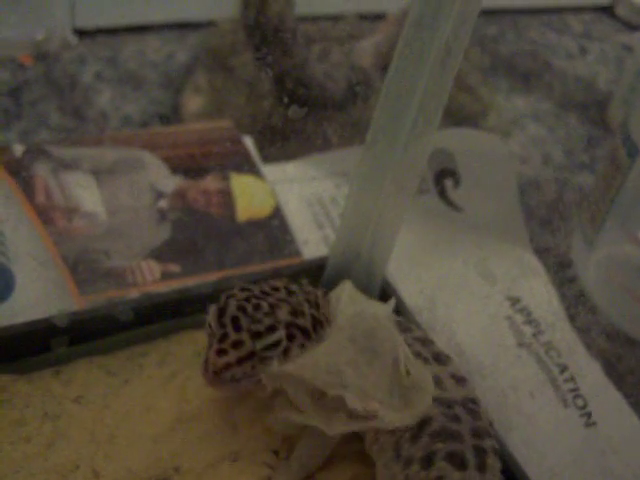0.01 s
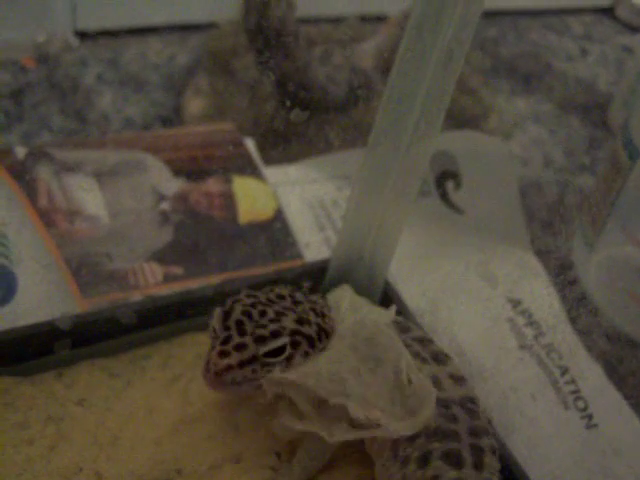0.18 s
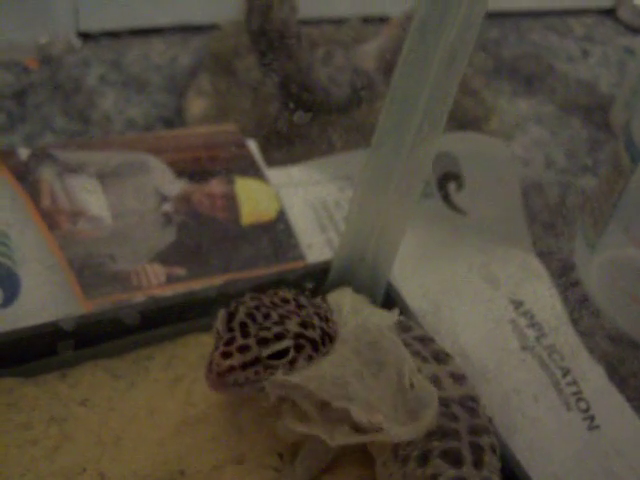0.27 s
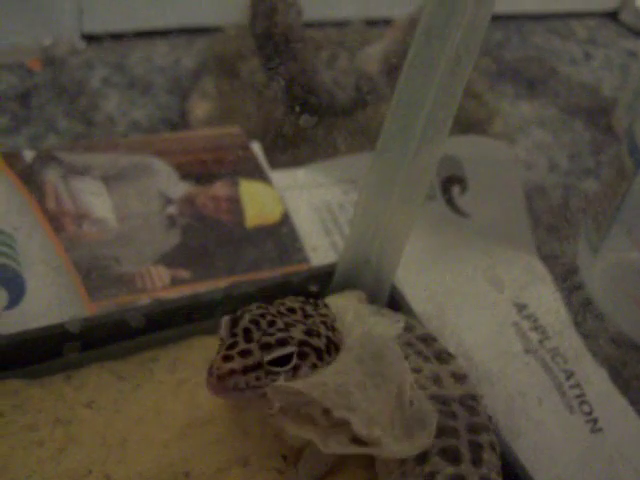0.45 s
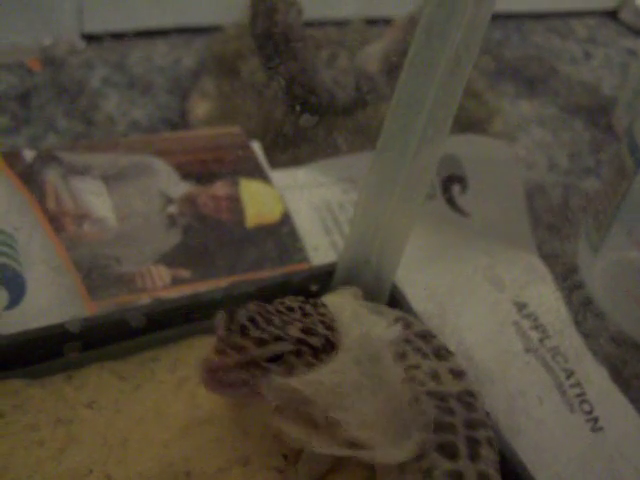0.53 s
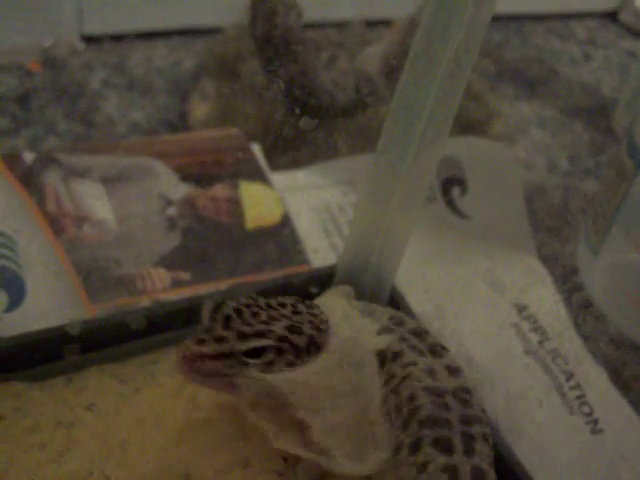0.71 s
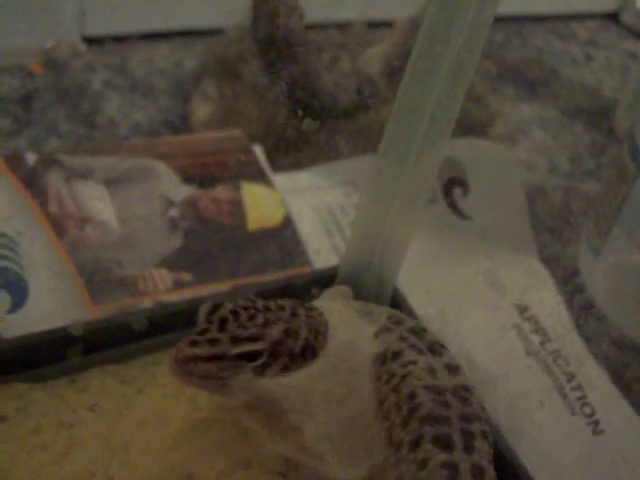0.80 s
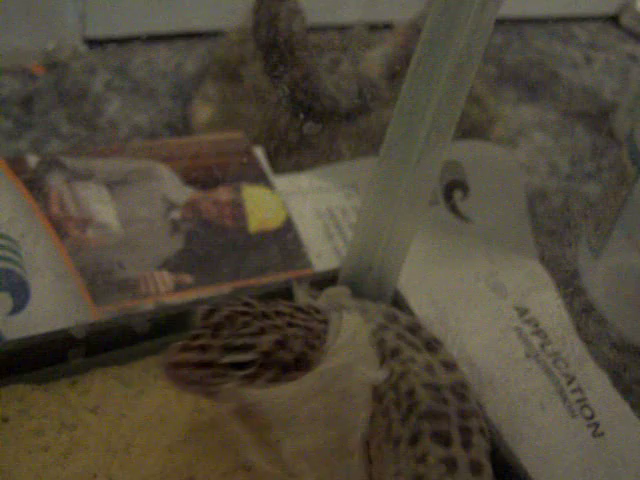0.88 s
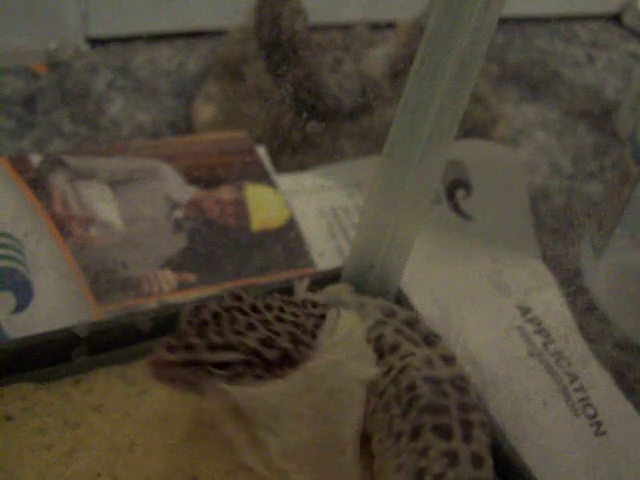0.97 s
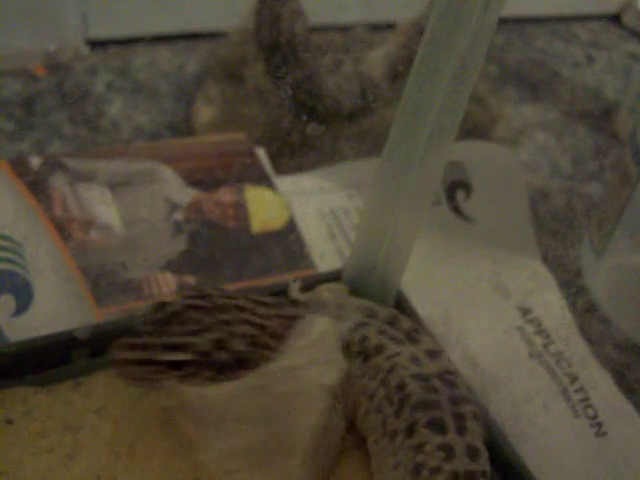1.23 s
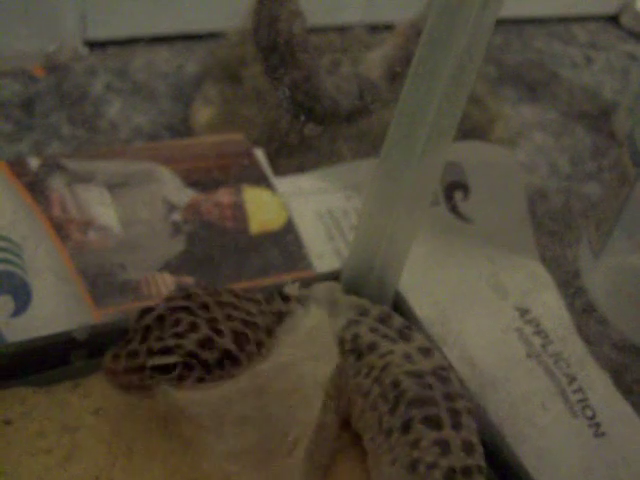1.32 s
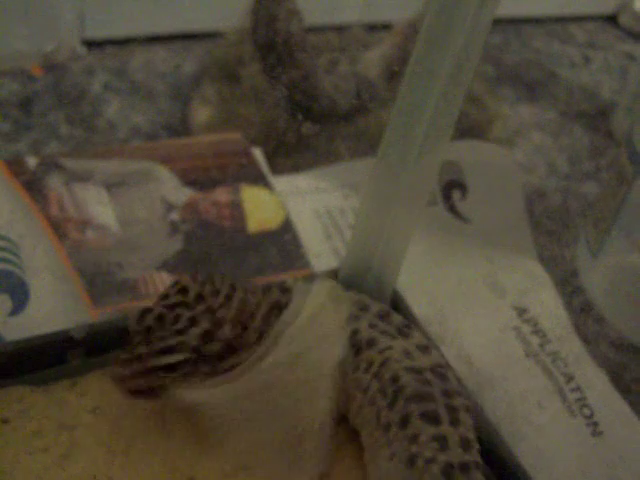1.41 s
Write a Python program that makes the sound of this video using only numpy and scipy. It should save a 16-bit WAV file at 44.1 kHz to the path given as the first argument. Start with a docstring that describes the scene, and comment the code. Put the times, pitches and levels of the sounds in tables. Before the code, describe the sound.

Soft, close crackling comes from a gecko shedding inside a small tank. Its dry skin snaps, rips in one harder tug, then the animal scuffs away, while the room hums and hisses faintly behind.

```python
"""Fine crinkling over a low room rumble, a hum and faint hiss: a gecko works out of its dry skin.
The skin gives way in sharp snaps, with one hard tug and a run of tears in the middle; each crease
or tear is a noise transient shaped by resonances. Then the animal steps away, its feet and sliding
body exciting the floor. The small tank around it rings briefly after each sound, through wall
reflections and lightly damped modes."""
import sys
import numpy as np
from scipy import signal
from scipy.fft import rfft, irfft
from scipy.io import wavfile

SR = 44100
rng = np.random.default_rng(int(sys.argv[2]) if len(sys.argv) > 2 else 0)


def to_wav(sig):
    """Store sig (one row per channel, or 1-D mono) as 16-bit WAV at the path in sys.argv[1].

    Samples outside -1..1 are clipped; the rate is SR.
    """
    pcm = np.clip(np.atleast_2d(sig), -1, 1) * 32767
    pcm = np.round(pcm).astype(np.int16)
    wavfile.write(sys.argv[1], SR, pcm.T)  # frames by channels


N = 63945

# Resonances that all the crackling passes through: f/Hz, bandwidth/Hz, gain/dB
CRACKLE_RESONANCES = [(1160, 200, -5.5), (1638, 82, -5), (1866, 200, -3.5), (2170, 460, 2.5), (2593, 71, 1),
                      (2890, 140, 1), (3912, 304, 3), (4146, 250, -5), (4700, 280, -7), (5290, 350, -4),
                      (6120, 740, -11.5), (7174, 370, -3.5)]
# Resonances of the floor: f/Hz, bandwidth/Hz, gain/dB
FLOOR_MODES = [(850, 380, -15), (1190, 230, -6), (2100, 660, -5.5), (3030, 400, 8), (3525, 200, 12),
               (3840, 250, 1.5), (4050, 200, 2.5), (5140, 270, -14.5), (6600, 370, -26.5)]


def from_db(db):
    """Amplitude ratio of a level: a factor of ten per 20 dB."""
    return 10 ** (np.asarray(db) / 20)


def rms_one(x):
    """Power normalisation to an rms of 1."""
    return x / np.sqrt(np.mean(x ** 2) + 1e-20)


def unit_energy(x):
    """Energy normalisation: the squares of each row sum to 1."""
    return x / np.sqrt(np.sum(x ** 2, axis=-1, keepdims=True) + 1e-20)


def envelope(points):
    """Amplitude envelope by linear interpolation of (t/s, level/dB) points."""
    return from_db(np.interp(np.arange(N) / SR, *np.transpose(points)))


def coloured(x, points):
    """Spectral shaping by (f/Hz, gain/dB) points on a logarithmic frequency axis; rms 1."""
    hz, db = np.transpose(points)
    bins = np.maximum(np.fft.rfftfreq(N, 1 / SR), 1)
    gain = from_db(np.interp(np.log(bins), np.log(hz), db))
    return rms_one(irfft(rfft(x) * gain, N))


def resonate(x, resonances):
    """Forced response of parallel damped resonators, plus a little direct sound, low-pass filtered."""
    out = from_db(-22) * x
    for hz, width, db in resonances:
        radius = np.exp(-np.pi * width / SR)
        feedforward = np.array([1, 0, -1]) * (1 - radius ** 2) / 2
        feedback = [1, -2 * radius * np.cos(2 * np.pi * hz / SR), radius ** 2]
        out = out + from_db(db) * signal.lfilter(feedforward, feedback, x)
    return signal.sosfilt(signal.butter(8, 7130, fs=SR, output="sos"), out)


def crinkle():
    """Shot noise: tiny creases of uneven size occur at random, and their decaying powers add."""
    # Crinkling as the animal moves: t/s, relative level/dB
    levels = [(0, -46), (.06, -47.5), (.1, -48.5), (.21, -44), (.29, -46), (.38, -51.5), (.44, -49),
              (.48, -48.5), (.54, -45.5), (.62, -43.5), (.66, -48.5), (.69, -40), (.73, -34.5), (.78, -37),
              (.83, -48), (.88, -42), (.95, -59.5), (.98, -44.5), (1.03, -45), (1.08, -57), (1.15, -52),
              (1.19, -53), (1.22, -56), (1.27, -46), (1.32, -57), (1.45, -47.5)]
    # Colour of the crinkling: f/Hz, gain/dB
    colour = [(500, 2), (1300, -2.5), (1800, -5), (3000, -0.5), (4000, 4), (5000, 2), (7300, 0.5),
              (8800, -1)]
    creases_per_s, spread_db, decay_s = 1100, 3.5, .001
    sizes = from_db(spread_db * np.minimum(rng.exponential(1, N), 4))
    creases = sizes * (rng.random(N) < creases_per_s / SR)
    power = signal.lfilter([1], [1, -np.exp(-2 / (decay_s * SR))], creases ** 2 + 1e-12)
    scratches = resonate(np.sqrt(power) * rng.standard_normal(N), CRACKLE_RESONANCES)
    return from_db(-2.5) * envelope(levels) * coloured(scratches, colour)


def rumble():
    """Amplitude-modulated noise: the room's low rumble slowly swells and sinks."""
    # Rumble spectrum: f/Hz, relative level/dB
    spectrum = [(25, -19), (45, -23.5), (62, -6), (85, -9.5), (140, 1.5), (175, -6.5), (240, -8.5),
                (335, -4), (410, -22), (600, -23.5), (1200, -63)]
    # Rumble envelope: t/s, level/dB
    levels = [(0, -44), (.07, -45), (.12, -50), (.19, -46.5), (.22, -47), (.33, -44), (.42, -48),
              (.75, -46.5), (.85, -49), (.96, -45), (1.2, -48), (1.33, -47.5), (1.45, -51)]
    return envelope(levels) * coloured(rng.standard_normal(N), spectrum)


def hiss():
    """Stationary broadband noise: the room's faint hiss."""
    # Hiss spectrum: f/Hz, relative level/dB
    spectrum = [(350, -3), (550, -6.5), (750, -3.5), (1400, -4.5), (2200, -2.5), (3300, -1), (3950, 0),
                (4800, -6), (6000, -15.5), (7400, -14.5), (8200, -19.5), (9000, -42.5)]
    return from_db(-52) * coloured(rng.standard_normal(N), spectrum)


def hum():
    """Random frequency and amplitude modulation make a low tone waver."""
    # Hum envelope: t/s, level/dB
    levels = [(0, -51), (.17, -64), (.23, -46.5), (.3, -48.5), (.4, -57), (.88, -60), (.95, -49),
              (.99, -44), (1.02, -50.5), (1.13, -50), (1.17, -36), (1.22, -63.5), (1.45, -57)]
    centre_hz, wander_hz, flutter_depth = 117.8, 3.5, 0.81
    t = np.arange(N) / SR
    wander, flutter = (np.interp(t, np.linspace(0, t[-1], n), rng.standard_normal(n)) for n in (24, 60))
    phase = 2 * np.pi * np.cumsum(centre_hz + wander_hz * wander) / SR
    return envelope(levels) * rms_one((1 + flutter_depth * flutter) * np.sin(phase))


def whine():
    """Superposition of faint steady sinusoids with random phases."""
    # Thin tones of the room: f/Hz, level/dB
    tones = [(339, -62), (554.5, -68), (592, -64.5)]
    t = np.arange(N) / SR
    return sum(from_db(db) * rms_one(np.sin(2 * np.pi * (hz * t + rng.random()))) for hz, db in tones)


def body_drag():
    """Sliding friction: the body drives the floor's resonances with faint continuous noise."""
    # Drag envelope: t/s, level/dB
    levels = [(0, -65), (.05, -48.5), (.12, -57), (1.15, -59.5), (1.19, -55), (1.27, -49.5), (1.32, -55.5),
              (1.45, -58.5)]
    return envelope(levels) * rms_one(resonate(rng.standard_normal(N), FLOOR_MODES))


def skin_snaps():
    """Sudden release of strain: each tear is a noise burst with its own balance of four bands."""
    # Tears: t/s, relative crack level/dB, then thud/dB, body/dB, edge/dB re the crack, rise time/s
    tears = [(0.124, -31.5, -23, -15, -5, 0.001), (0.2435, -28.5, -49, -1.6, -10.5, 0.00026),
             (0.287, -46, -30, -13, 5.5, 0.00054), (0.312, -42, -16, 4.5, 7, 0.00088),
             (0.3205, -28.5, -23, -13.5, -6, 0.00036), (0.328, -40.5, -19, -7, -16, 0.00097),
             (0.3405, -40.1, -21, -11, -7, 0.0008), (0.3478, -31, -26, -18.5, -5.5, 0.0012),
             (0.401, -31, -32, -5, -2.5, 0.0016), (0.4054, -43.5, -12.5, -4.5, 2.5, 0.0023),
             (0.4176, -30, -23, -12, -12.0, 0.00071), (0.4281, -20, -36, -8, -11.9, 0.00086),
             (0.4423, -47, -19.5, 0, 9, 0.00035), (0.4561, -31, -26, -7, -2, 0.00044),
             (0.503, -40, -28, -19, -6.5, 0.0008), (0.532, -49, -15.0, -7, 10.5, 0.002),
             (0.5522, -30, -19, -13, -13, 0.00027), (0.5541, -38, -11, -3.5, 5.5, 0.0022),
             (0.616, -46.5, -20, -10, 8.5, 0.0008), (0.623, -44.5, -20, -16, 3.5, 0.00074),
             (0.6985, -19, -9, -1.5, -7, 0.000067), (0.7007, -21, -25, -22, -5.5, 0.00035),
             (0.7032, -28, -15, -12, -10, 0.00052), (0.7079, -23.5, -28.5, -7, -20.5, 0.00096),
             (0.7113, -25, -26, -10, -8, 0.0008), (0.7222, -24, -13, -6.5, -9, 0.0014),
             (0.731, -24.5, -6.5, -0.9, -3.5, 0.00058), (0.7355, -29.5, -23, -1.5, -7.4, 0.0024),
             (0.7501, -24, -15, -5, -8, 0.00072), (0.7722, -32, -22, -4.5, -3, 0.00059),
             (0.7795, -32, -23, -11, -8, 0.00054), (0.793, -31, -23, -19, -13, 0.0008),
             (0.8003, -34.5, -13.5, -5, -0.5, 0.0032), (0.831, -41.5, -14.5, -6, -7, 0.0006),
             (0.892, -37.3, -21, -8.5, -10, 0.00073), (0.9121, -33, -18, -6, -13, 0.00038),
             (0.9212, -29.5, -26, -17, -7, 0.00083), (0.982, -35, -32.5, -12.5, -10.5, 0.002),
             (1.042, -36, -17, -20, -10, 0.0041), (1.1108, -43.5, -21, -5.5, -5.5, 0.001)]
    # Limits of the thud, body, crack and edge bands: f/Hz
    limits = [570, 1520, 3250, 4700, 9000]
    gain_db, release_s = 21.5, 0.0011
    t = np.arange(SR // 50) / SR
    onsets, crack_db, thud_db, body_db, edge_db, rise = np.transpose(tears)[:, :, None]
    shapes = np.minimum(t / (rise + 1e-9), 1) * np.exp(-np.maximum(t - rise, 0) / release_s)
    bursts = resonate(rng.standard_normal(shapes.shape) * shapes, CRACKLE_RESONANCES)
    snaps = 0
    for low, high, band_db in zip(limits, limits[1:], (thud_db, body_db, 0, edge_db)):
        band = signal.sosfilt(signal.butter(5, (low, high), "band", fs=SR, output="sos"), bursts)
        snaps = snaps + from_db(gain_db + crack_db + band_db) * unit_energy(band)
    out = np.zeros(N + SR)
    for start, snap in zip((onsets[:, 0] * SR).astype(int), snaps):
        out[start:start + len(t)] += snap
    return out[:N]


def footsteps():
    """Impact excitation: short scratchy contacts of the feet set the floor's resonances ringing."""
    # Taps and scuffs: t/s, relative level/dB, decay time/s
    contacts = [(1.1713, -28, 0.00036), (1.1756, -35.5, 0.0029), (1.1904, -43, 0.0011),
                (1.2238, -42.5, 0.00086), (1.2757, -35.5, 0.001), (1.2822, -38, 0.0017),
                (1.2893, -44.5, 0.00054)]
    gain_db = 21
    t = np.arange(SR // 50) / SR
    out = np.zeros(N + SR)
    for onset, db, decay in contacts:
        force = rng.standard_normal(len(t)) * np.exp(-t / decay)
        start = int(onset * SR)
        out[start:start + len(t)] += from_db(gain_db + db) * unit_energy(resonate(force, FLOOR_MODES))
    return out[:N] + body_drag()


def tank(x):
    """Reverberation by convolution: close walls give dense quick echoes, a tail and ringing modes."""
    # Lightly damped modes of the tank: f/Hz, T60/s, level/dB
    modes = [(1724, 0.29, -60.5), (1748, 0.16, -62.5), (1780, .2, -61.5), (3660, .2, -55),
             (3690, 0.15, -62), (3622, .18, -58.5), (3854, 0.067, -63.5), (4350, 0.16, -60.5)]
    first_echo_s = 0.0013
    t = np.arange(SR // 3) / SR
    response = np.zeros(len(t))
    response[0] = 1  # direct sound
    for db, t60 in ((-9.5, 0.065), (-20, .22)):  # quick echoes, then the faint tail
        echoes = rng.standard_normal(len(t)) * (t > first_echo_s)
        response += from_db(db) * unit_energy(echoes * from_db(-60 * t / t60))
    for hz, t60, db in modes:
        response += from_db(db - 60 * t / t60) * np.cos(2 * np.pi * hz * t)
    return signal.fftconvolve(x, response)[:N]


def scene():
    """Superposition: the animal's sounds reverberate in the tank and add to those of the room."""
    gecko = skin_snaps() + crinkle() + footsteps()
    return (tank(gecko) + rumble() + hiss() + hum() + whine())[None]


def record(dry):
    """Low-pass filtering: an elliptic filter cuts the treble steeply."""
    cutoff_hz = 8800
    return signal.sosfilt(signal.ellip(10, .2, 75, cutoff_hz, fs=SR, output="sos"), dry)


dry = scene()
out = record(dry)
to_wav(out)
```